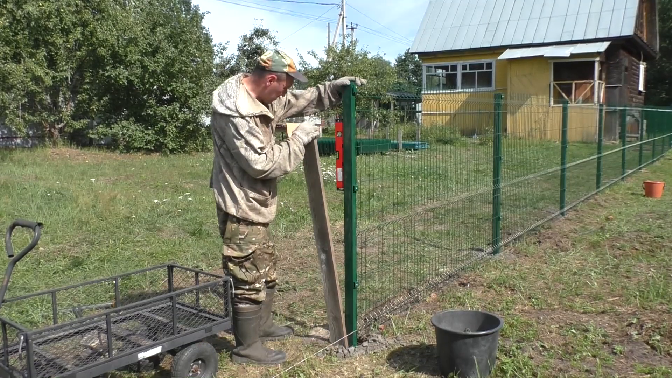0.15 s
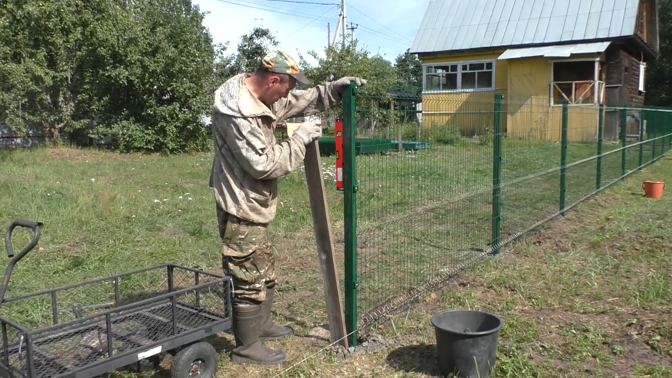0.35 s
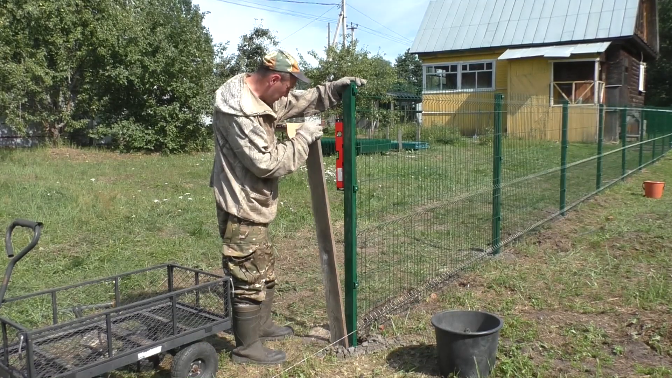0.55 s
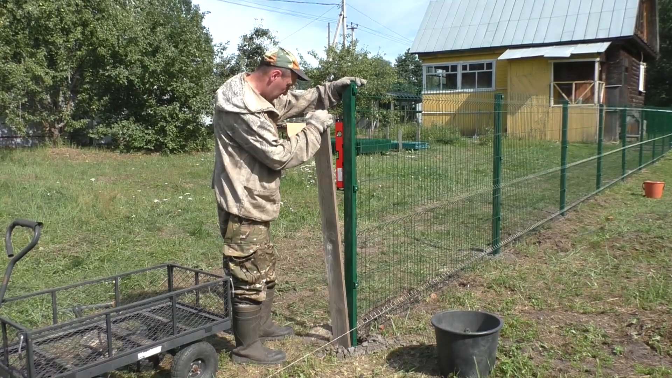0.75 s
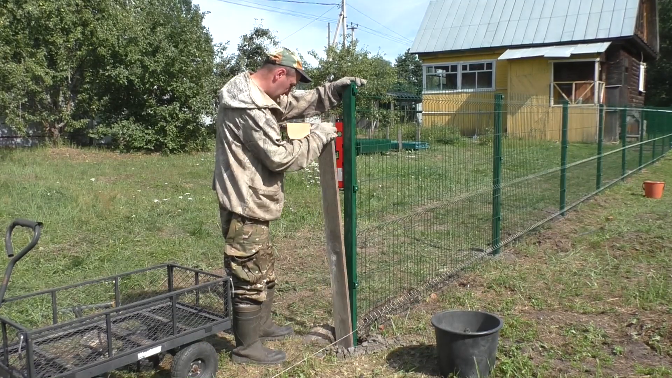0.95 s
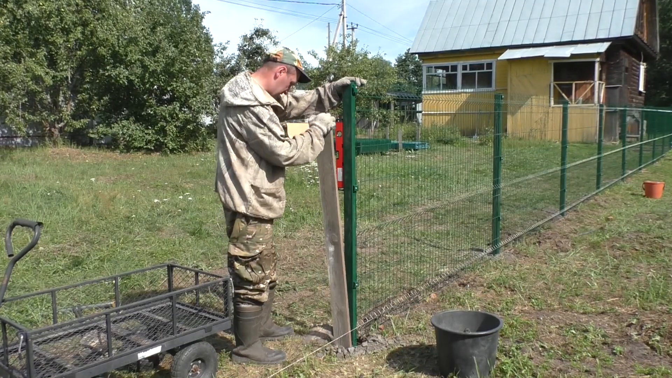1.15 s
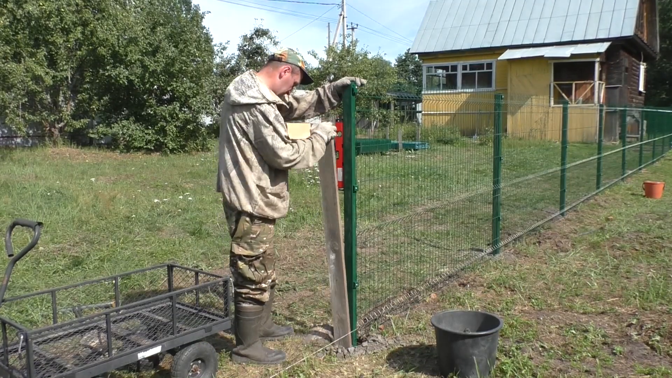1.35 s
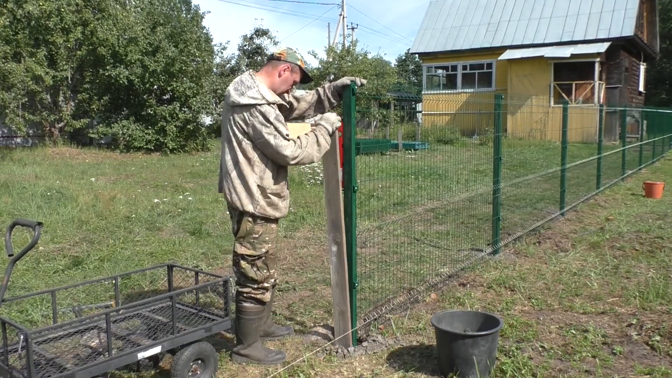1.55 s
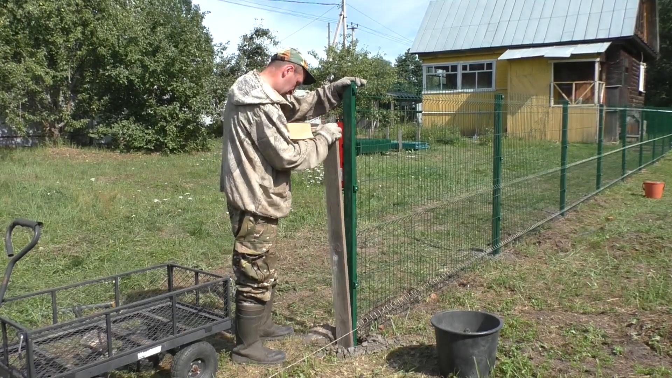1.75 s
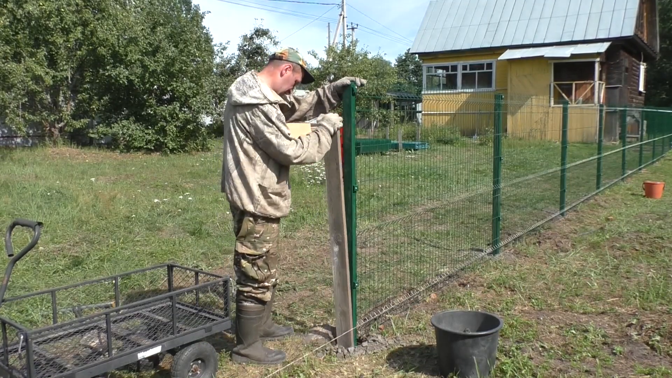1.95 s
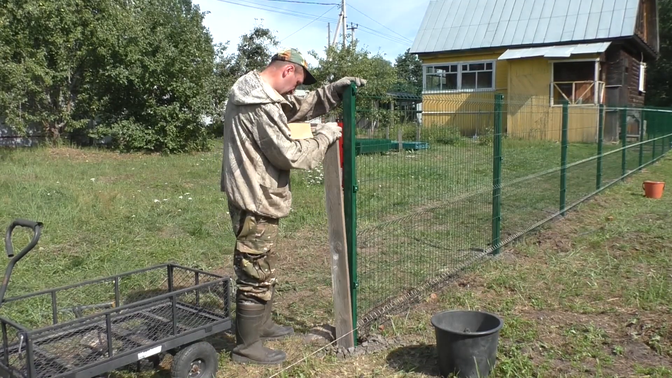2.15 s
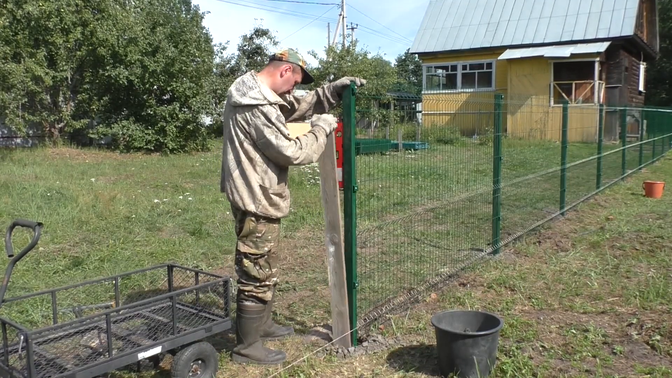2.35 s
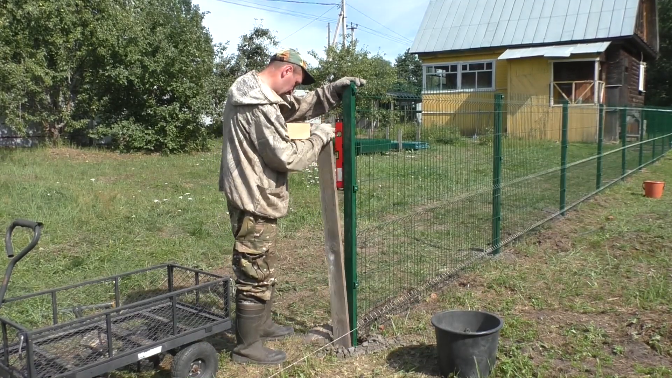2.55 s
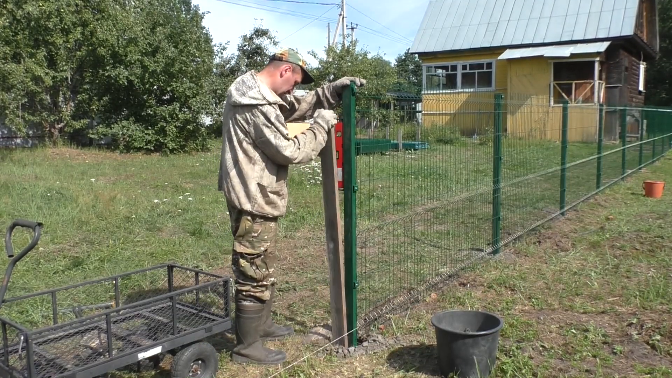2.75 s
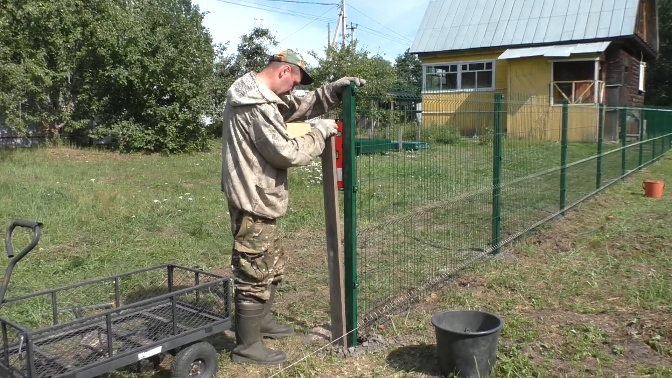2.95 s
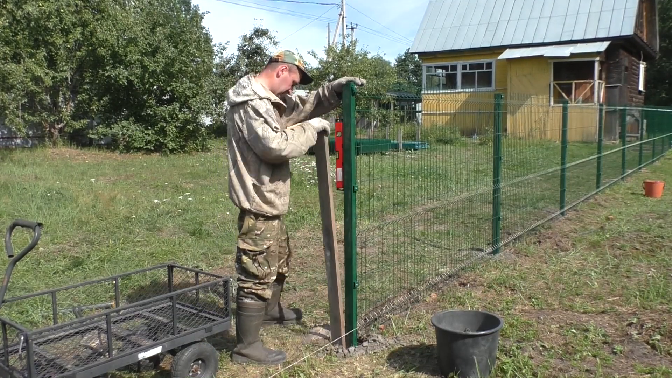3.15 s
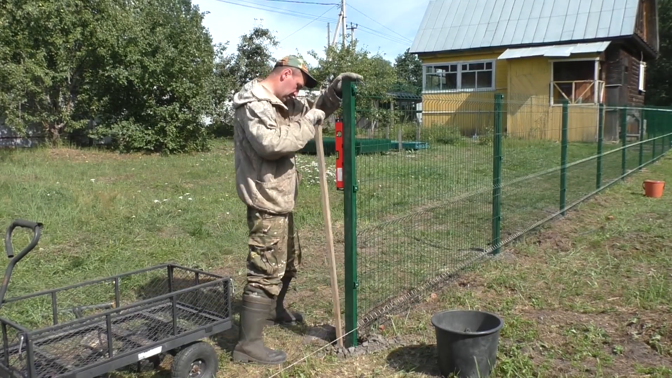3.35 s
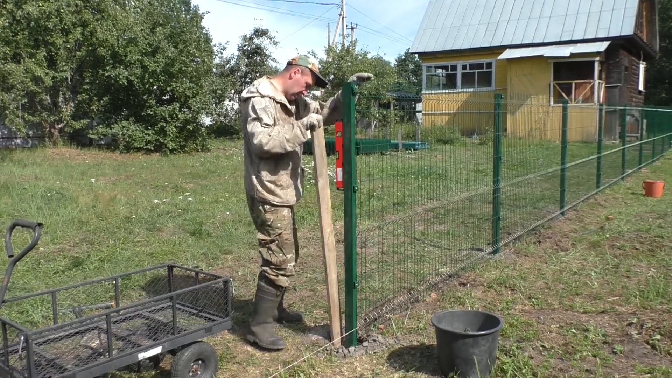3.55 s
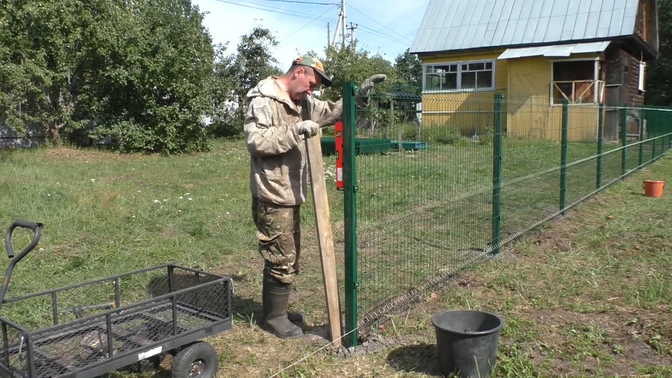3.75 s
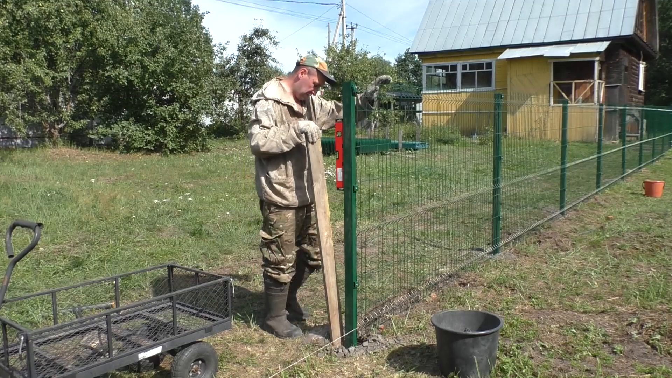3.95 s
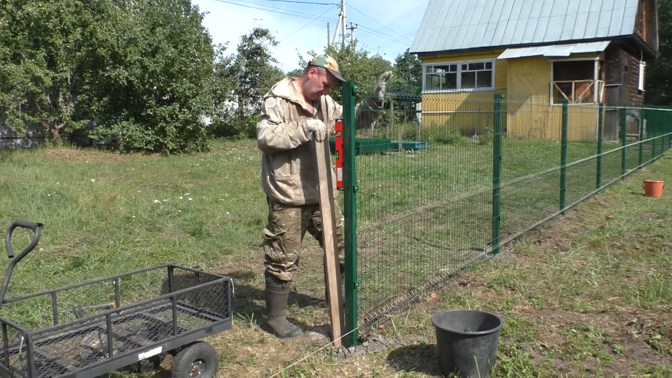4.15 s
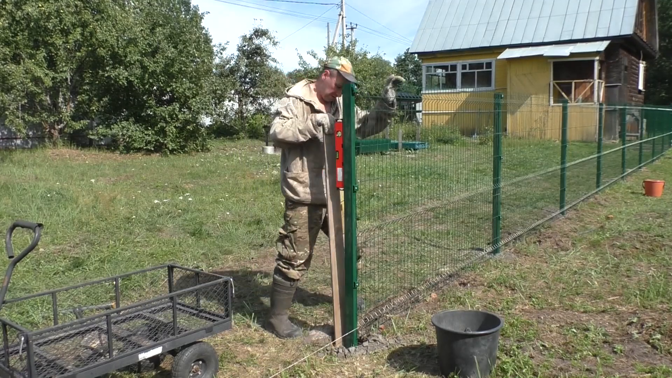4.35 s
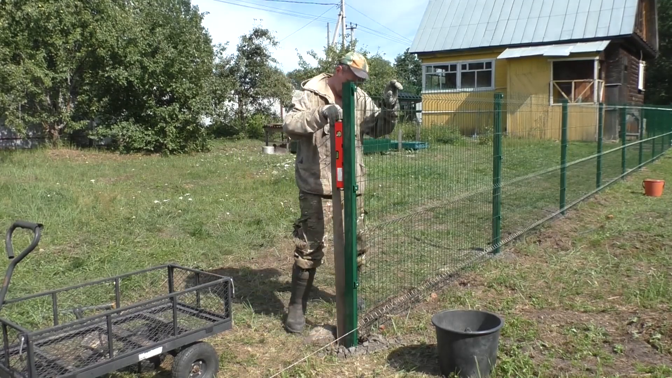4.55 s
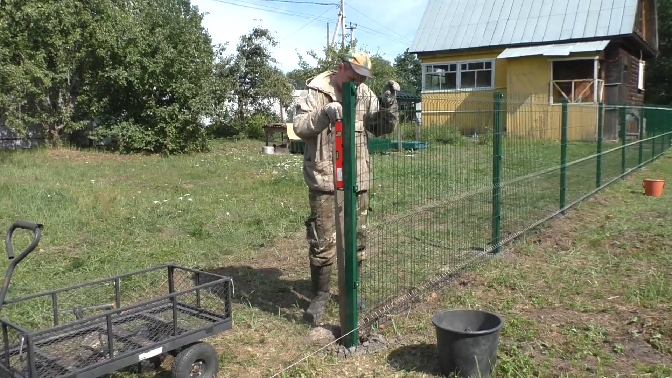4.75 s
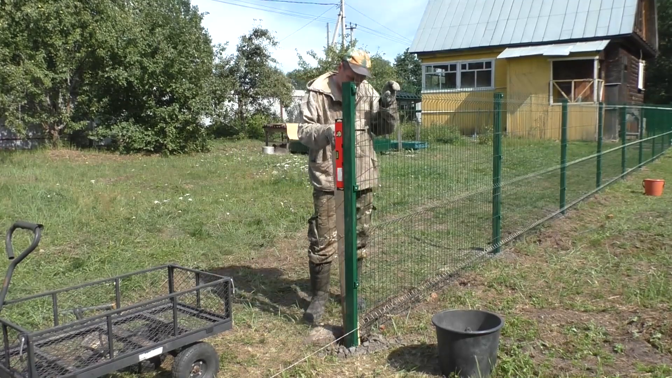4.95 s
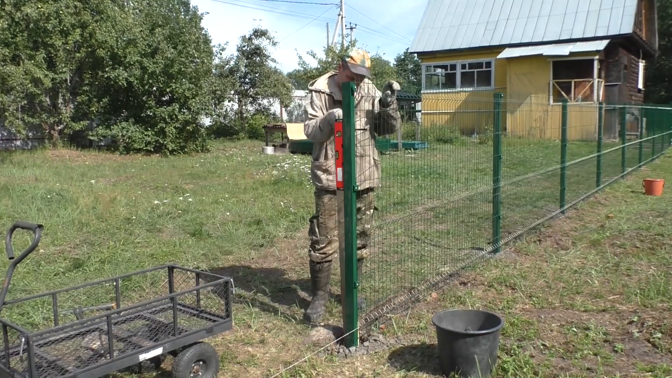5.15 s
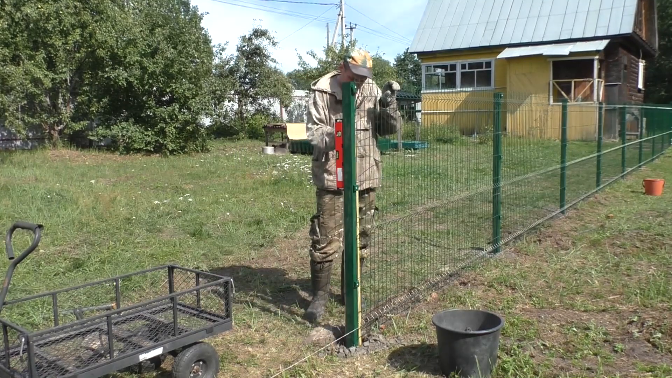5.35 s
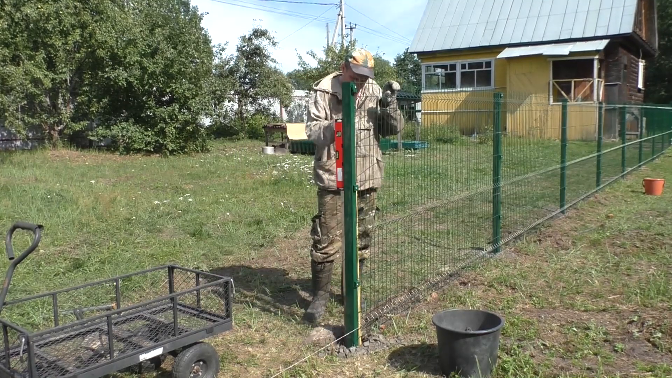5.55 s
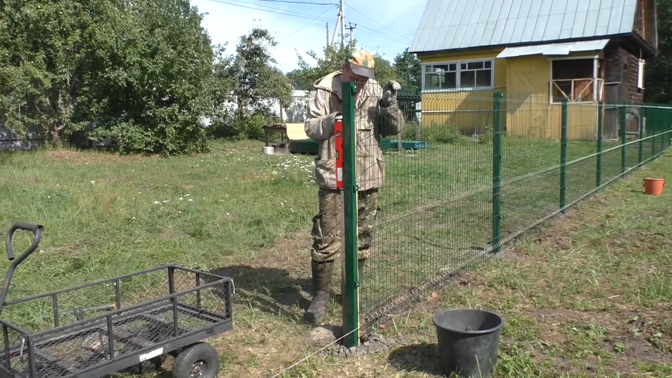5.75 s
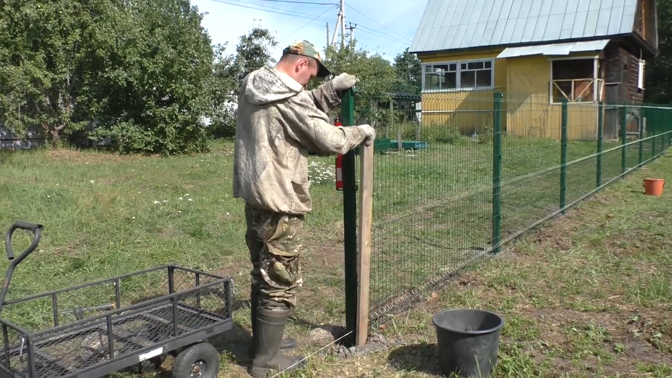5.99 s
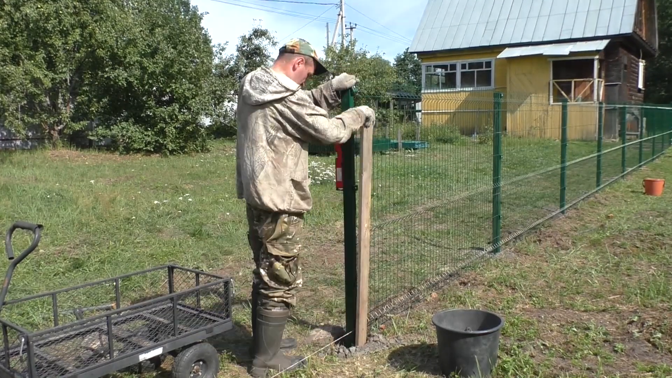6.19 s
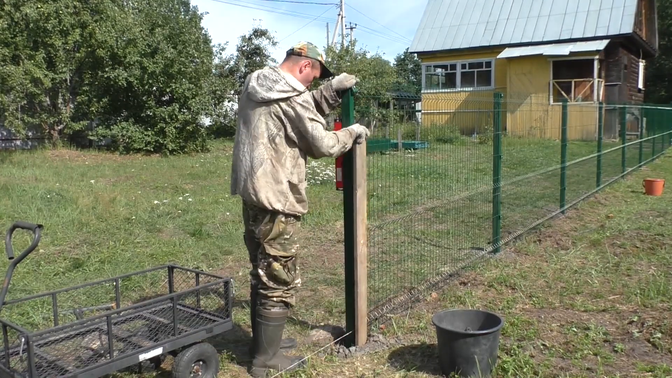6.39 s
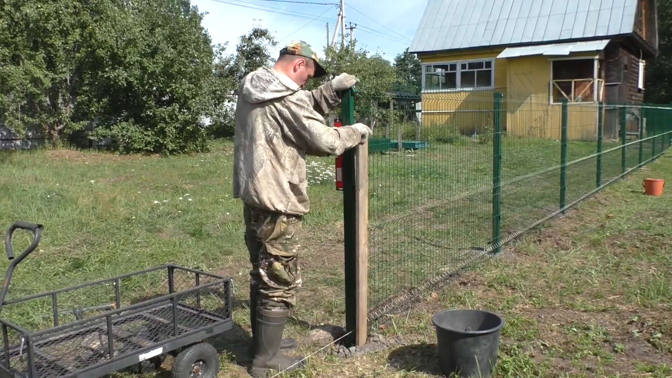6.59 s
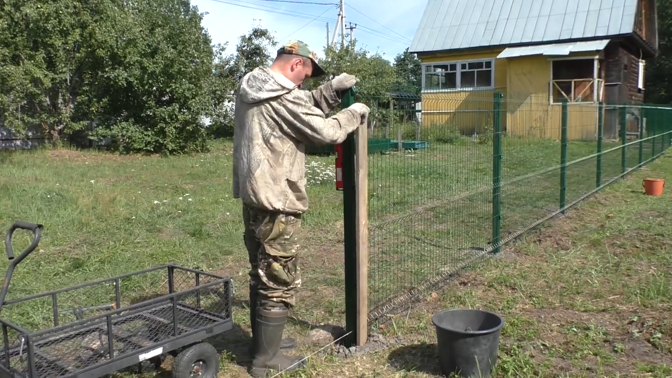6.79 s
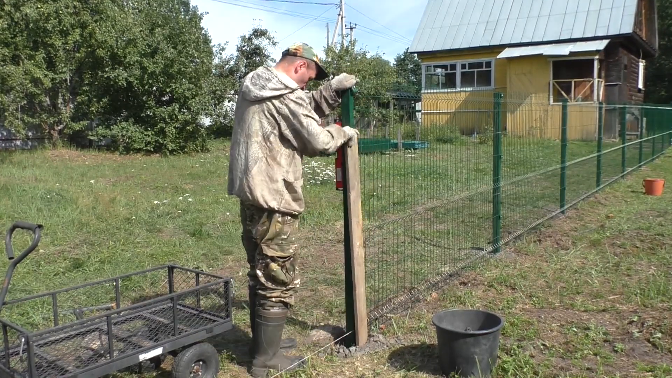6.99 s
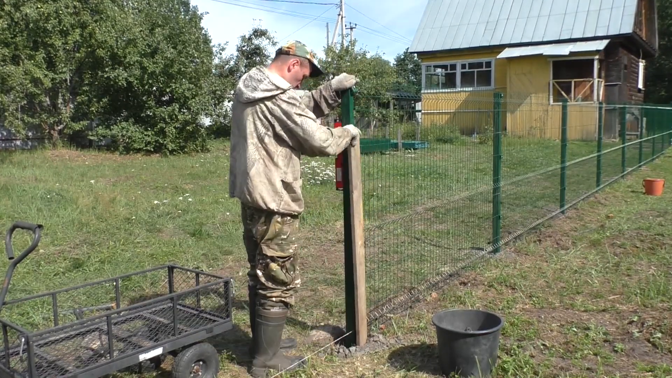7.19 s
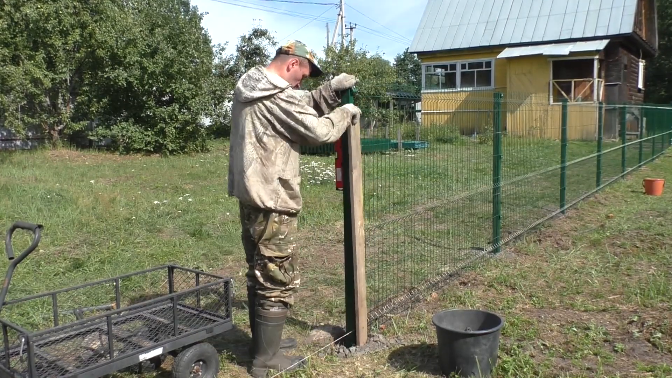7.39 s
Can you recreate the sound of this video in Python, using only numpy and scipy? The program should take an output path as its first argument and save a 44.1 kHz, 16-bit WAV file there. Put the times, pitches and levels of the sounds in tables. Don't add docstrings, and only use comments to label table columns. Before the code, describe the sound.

A calm garden opens with faint distant hum, leaf hiss and high grasshopper chorus; small pebbles tick and gravel shifts around 0.8 s. At 1.03 s a board rams gravel with a loud grinding crunch, ringing the steel post. Sharp stone-cracking blows follow at about 1.4, 1.8, 2.2, 2.6 and 2.9 s, with gravel trickling between and a near insect rasping from 1.8 to 2.6 s. Boots scuff near 3.3 s, a softer crunch lands at 3.7, then it is quieter with tiny ticks. Spaced blows resume at 4.9 and 5.4 s, then a rough double crunch with wire shiver at 5.9. Gravel scuffs and slides lead into very hard blows at 6.44 and 7.07 s, while low wind puffs bump the microphone from 6.1 to 7. Short echoes return from a wall and trees; gravel trickles out to the end at about 7.4 s.

```python
import sys
import numpy as np
from scipy import signal
from scipy.fft import rfft, irfft, next_fast_len
from scipy.io import wavfile
from scipy.ndimage import uniform_filter1d, map_coordinates

SR = 44100
rng = np.random.default_rng(int(sys.argv[2]) if len(sys.argv) > 2 else 0)


def wav_out(sig):
    wavfile.write(sys.argv[1], SR, np.round(np.clip(np.atleast_2d(sig).T, -1, 1) * 32767).astype(np.int16))


def invert_db(level):
    return 10 ** (np.asarray(level, dtype=float) / 20)


N = 327663

# time_s, gain_db
INPUT_GAIN = [(0, -0.5), (1.0, 0), (1.41, 1), (1.51, -5.5), (1.8, -7.5), (2.7, -5.5), (4.1, -6.5),
              (4.3, -4.5), (4.95, -4.5), (5.9, -3), (6.5, -3), (6.85, -1.5), (7.08, 4.5), (7.43, 0.5)]
# time_s, above_calm_db
BREEZE = [
    (0, 1),
    (1.4, 1),
    (3.4, 2),
    (5.9, 1),
    (6.13, 14),
    (6.46, 19),
    (6.85, 11),
    (7.1, 1.5),
    (7.43, 4),
]
# freq_hz, density_db_per_hz
HUM_SPECTRUM = [(65, -48), (110, -59), (127, -16), (234, -0.5), (375, -1.5), (594, -10), (677, -11.5),
                (1510, -9.5), (1810, -13.5), (2350, -17.5), (2860, -22.5), (4750, -32.5), (5500, -53),
                (7150, -56), (12100, -120)]
# freq_hz, density_db_per_hz
LEAF_SPECTRUM = [(2650, -36), (4500, -1), (5400, -1), (6200, 2.5), (7180, 7.5), (8270, 6.5), (8980, 8.5),
                 (10100, 6.5), (14700, 4.5), (15300, 9), (15900, -19), (16200, -50)]
# freq_hz, density_db_per_hz
WIND_SPECTRUM = [(8.8, -45), (15, -10.5), (70, 4), (171, -11.5), (205, 0.5), (260, -19), (340, -14),
                 (570, -120)]
# freq_hz, likeness_0_to_1
LIKENESS = [(60, 0.96), (130, 0.23), (290, 0.85), (640, 0.91), (1410, 0.78), (3100, 0.1), (6820, 0.91),
            (15000, 1.0)]
# start_s, peak_db, pitch_hz, left_minus_right_db
PUFFS = [
    (6.104, -42, 73.6, 9),
    (6.204, -41, 217, -12),
    (6.396, -36, 105.4, -13),
    (6.653, -35, 137, -5),
    (6.954, -39, 102, -4),
]
HUM_DB, LEAVES_DB, WIND_DB = -49, -55, -59
LEAVES_PER_GAIN, WIND_PER_GAIN, HUM_PER_BREEZE = 0.74, 1, 0.43

# time_s, level_db, wing_hz
CHORUS = [(0, -56, 7270), (.25, -67, 7220), (1, -88, 7300), (1.3, -59.5, 7300), (2.55, -63.5, 7330),
          (2.7, -64, 7740), (3.1, -61.5, 7900), (3.8, -69, 7600), (5.9, -65, 7500), (6.15, -60.5, 7300),
          (6.7, -58.5, 7300), (7.43, -57, 7300)]
# time_s, level_db
NEAR_INSECT = [
    (1.6, -90),
    (1.8, -66),
    (2.15, -56),
    (2.24, -54),
    (2.3, -52),
    (2.4, -54),
    (2.555, -51.5),
    (2.575, -90),
]
# centre_hz, width_hz, gain_db
WING_MODES = [(7330, 210, -6.5), (8050, 300, -6), (8900, 380, 0.5), (9900, 700, -2)]
STROKES_PER_S = 49.3

# delay_s, level_db, smear_s, top_hz
ECHOES = [
    (0.0274, -19.5, 0.0057, 7500),
    (0.092, -28, 0.033, 4870),
]
YARD_DB, YARD_T60_S = -23.5, 0.78

# freq_hz, density_db_per_hz
TRICKLE_SPECTRUM = [(410, -24), (700, -11), (818, -33), (934, -0.5), (1480, -3), (1670, 2.5), (1820, -4.5),
                    (2350, -10.5), (2630, -8.5), (2910, -8), (5000, -18.5), (6500, -74), (11000, -120)]
# freq_hz, density_db_per_hz
RUSTLE_SPECTRUM = [(1800, -11.5), (3000, 8.5), (4600, 2.5), (6500, 3), (9000, -2), (13000, -12),
                   (16500, -45)]
# peak_time_s, gravel_db, rustle_db, post_db
LIFTS = [(.8, -60, -62.5, -80), (1.09, -45, -53.5, -72), (1.24, -62, -72, -59), (1.47, -50.5, -56.5, -80),
         (1.97, -49.5, -56, -74), (2.33, -53.5, -58.5, -71), (2.9, -50, -68, -63), (3.29, -59.5, -82, -81),
         (3.8, -56.5, -78, -66), (4.45, -62, -75, -83), (5.049, -51.5, -61, -58.5),
         (5.451, -42.5, -53.5, -54), (6.1, -44.5, -51.5, -44), (6.53, -40.5, -51, -53.5),
         (6.82, -45.5, -58, -50.5), (7.12, -37, -48.5, -37.5), (7.25, -51, -58, -59)]
# gravel_db, rustle_db, post_db
REST_DB = (-62.5, -83.5, -84)
RUN_RISE_DB_PER_S = 135
GRAVEL_FALL_DB_PER_S, RUSTLE_FALL_DB_PER_S, POST_FALL_DB_PER_S = 33.5, 83, 20.5
RUSTLE_LAG_S, POST_LAG_S = 0.0037, 0.049

# start_s, peak_db,
# pitch_hz, t60_s
POST_PINGS = [(1.052, -29, 957, 0.38), (1.054, -38, 1708, 0.81), (1.06, -41, 1556, 0.74),
              (1.06, -31, 2500, 0.15), (5.974, -44, 1800, .08), (5.975, -42, 2650, .08),
              (7.113, -37, 2640, 0.87), (7.161, -26.5, 1650, 0.28), (1.83, -43.5, 954, 0.49),
              (2.2, -37.5, 966, 0.35), (2.724, -27.5, 1390, 0.027), (2.7236, -31, 1970, 0.025),
              (4.557, -44.5, 1490, 0.19), (4.941, -46, 1310, 0.93), (5.407, -30, 1380, 0.36),
              (5.929, -34.5, 932, 0.2), (5.869, -24, 323, 0.057)]
# start_s, peak_db
WIRE_PINGS = [
    (1.439, -46),
    (1.848, -55),
    (2.205, -53),
    (2.613, -47),
    (2.93, -44),
    (5.9225, -34),
]
WIRE_HZ, WIRE_T60_S = 13577, .25
SCENE_CHANGE_S = 5.972
# centre_hz, width_hz, gain_db
POST_MODES = [(925, 30, 8.5), (1190, 5.6, 16), (1390, 10, 15.5), (1620, 21, 10.5), (1714, 20, 12),
              (2625, 55, 15), (2650, 92, -2)]

# start_s, peak_db, pitch_hz
THUDS = [(1.4265, -28.5, 45), (1.815, -28, 45), (1.031, -20, 378), (1.424, -28, 152), (1.818, -22.5, 200),
         (2.187, -38, 140), (2.567, -26.5, 262), (2.913, -29.5, 280), (4.924, -27.5, 282),
         (5.393, -26.5, 110), (6.442, -26, 200), (7.066, -25.5, 251)]
SOIL_WIDTH_HZ = 223

# start_s, peak_db, stone_hz, bright_db, grind_s
SCUFFS = [(.89, -38, 3300, -26, 0.025), (.956, -42, 4070, -14, .0018), (2.611, -33, 1920, -17, 0.043),
          (2.62, -30, 5000, 24, 0.0022), (2.643, -33, 4910, 22, 0.0024), (2.674, -27.5, 3800, 4, 0.0077),
          (2.781, -37, 5500, 24, 0.0016), (3.263, -37.5, 1510, -4.5, 0.05), (3.574, -49, 4100, -14, .005),
          (3.627, -38, 2370, -2, 0.01), (3.8, -39, 1610, -16, .001), (4.734, -43.5, 2520, -4, 0.068),
          (4.882, -41, 2960, -14, 0.021), (5.40, -28.5, 1660, -10, 0.058), (6.076, -28, 3530, -5, 0.0015),
          (6.152, -31, 4600, 9, 0.002), (6.39, -32.5, 2200, -12, 0.041), (6.52, -30, 3620, -28, 0.1),
          (7.004, -23, 3200, -5, 0.057), (7.26, -30, 9150, -3, 0.011), (7.308, -43, 2600, -17, 0.0064)]
# start_s, peak_db, stone_hz, bright_db, grind_s
SETTLES = [(.757, -42, 3720, -12, .005), (.866, -37.5, 2720, -5, 0.0083), (1.589, -35, 1510, -27, 0.0027),
           (1.952, -35, 1230, -26, 0.0053), (2.722, -38, 1620, -35, 0.024), (3.289, -32, 1760, 5.5, 0.01),
           (3.679, -19, 2600, -10.5, 0.011), (3.755, -34, 2560, -10, 0.011), (4.556, -46, 1470, -30, 0.022),
           (4.935, -20, 2150, -11, 0.019), (5.196, -41, 1620, -26, 0.012),
           (5.388, -9.5, 2100, -9.5, 0.0075), (5.488, -30, 1660, -4, 0.015),
           (5.865, -9.5, 1950, -13.5, 0.0089), (5.9232, -17, 3030, -2.5, 0.0068),
           (6.009, -26, 1480, -11, 0.048), (7.009, -17.5, 2000, -5, 0.037), (7.164, -26.5, 1650, -9, 0.04)]
# start_s, peak_db, stone_hz, bright_db, slide_s
SLIDES = [
    (2.545, -31, 2840, -5, 0.033),
    (5.36, -37, 1570, -24, 0.027),
    (6.41, -20, 1300, -11, 0.038),
    (7.03, -11, 1510, -11, 0.043),
]
# start_s, peak_db, stone_hz, bright_db, grind_s
RAMS = [(1.031, -10.5, 1280, -29, 0.016), (1.029, -5.5, 2540, -6.5, 0.027),
        (1.4248, -11, 2440, -4.5, 0.0065), (1.809, -7, 1390, -24, 0.017), (1.808, -7, 2120, -2, 0.015),
        (2.565, -6, 2140, 0.5, 0.0012), (2.184, -1, 1404, -8.5, 0.0039), (2.5828, -9, 2600, 6, 0.0037),
        (2.901, -23, 2600, -4, 0.01), (2.911, -7.5, 2840, -6, 0.0023), (2.913, -22, 1256, -40, 0.0074),
        (3.671, -18, 1560, -20, 0.016), (4.9212, -9, 1920, -7, 0.012), (5.3845, -8.5, 2120, -24, 0.0041),
        (5.876, -13, 1540, -24, 0.018), (5.925, -21.5, 1180, -8, 0.044), (6.415, -17, 2270, -27, 0.0046),
        (6.4415, 0, 2100, -7, 0.0049), (6.443, -23, 1080, -25, 0.0014), (7.063, -5, 2940, -3, 0.0066),
        (7.076, -15, 1500, -8, 0.0057)]
# centre_hz, width_hz, gain_db
BOARD_MODES = [(1020, 600, 8.5), (1300, 630, 13), (1650, 595, 7.5), (2100, 41, 4.5), (2600, 180, -5),
               (3200, 2340, 1), (4570, 1590, -1)]

# peak_time_s, peak_db, pitch_hz
TICKS = [(.8685, -33, 2400), (.869, -39, 4600), (3.2925, -43, 1750), (4.9125, -34, 1650),
         (5.9226, -24, 1900), (.9075, -36, 3560), (.9185, -39, 3280), (.9185, -42, 4700), (1.29, -49, 3700),
         (1.362, -45, 3560), (3.849, -36, 1420), (3.927, -55, 3800), (3.968, -52, 5000), (4.058, -52, 3800),
         (4.558, -42, 2000), (4.562, -48, 3250), (6.0095, -33, 1400), (7.165, -37, 1650)]
# peak_time_s, peak_db, pitch_hz
STRUCK_STONES = [(1.0323, -13.5, 3300), (1.0325, -12, 2010), (1.0328, -16, 1270), (1.0335, -13.5, 2710),
                 (1.0375, -14, 1780), (1.039, -12, 2600), (1.0455, -21, 3230), (1.0427, -20, 1300),
                 (1.044, -18, 2570), (1.044, -17, 1970), (1.0485, -17, 2530), (1.0486, -21, 1540),
                 (1.057, -21, 1300), (1.0745, -24, 1520), (1.426, -17.5, 1215), (1.4275, -16, 1650),
                 (1.4297, -25, 3050), (1.4327, -26, 2380), (1.433, -30, 1400), (1.8096, -18.5, 1300),
                 (1.8101, -17.5, 2080), (1.8109, -21, 6250), (1.8183, -24, 1950), (1.8192, -20, 2550),
                 (1.8194, -18, 1470), (2.1847, -25, 1260), (2.1857, -16.5, 1646), (2.1868, -22, 1200),
                 (2.1885, -15, 2600), (2.1895, -18, 1300), (2.1903, -41, 2060), (2.1919, -20, 3000),
                 (2.566, -20, 3800), (2.5662, -23, 2270), (2.5667, -20.5, 1140), (2.567, -24, 4550),
                 (2.5834, -17, 3960), (2.5838, -21, 4820), (2.584, -13, 3060), (2.5857, -18.5, 1970),
                 (2.912, -26, 1840), (2.9142, -18, 2985), (2.9147, -17, 6100), (2.9151, -19.5, 1410),
                 (2.9151, -20, 4920), (2.9153, -28, 4070), (2.9159, -18, 2070), (3.6815, -27, 1650),
                 (3.6827, -29, 2400), (3.6856, -32, 3200), (3.6886, -22, 2630), (3.6936, -31, 2600),
                 (3.7002, -32, 2530), (3.712, -39, 1090), (3.718, -37, 2720),
                 (4.9226, -16, 1720), (4.922, -24, 5230), (4.9255, -27, 2540), (4.9266, -17.5, 1200),
               (4.9273, -24, 3640), (4.9277, -18, 2020), (4.9288, -19.5, 2650), (4.932, -14, 1534),
               (4.9327, -25, 2200), (4.9424, -20, 1510), (5.3892, -18, 2600), (5.3888, -14, 2020),
               (5.3925, -25, 3420), (5.3928, -31, 4530), (5.3927, -8, 2834), (5.3935, -24, 2120),
               (5.3939, -22, 4830), (5.3983, -25, 1490), (5.8658, -28, 2600), (5.866, -19, 3880),
               (5.8667, -12, 2190), (5.8682, -14.5, 3300), (5.8682, -18, 1640), (5.8716, -20, 2300),
               (5.8767, -25, 1610), (5.8805, -12, 1560), (5.885, -30, 1650), (5.923, -28, 3990),
               (5.923, -24, 6430), (5.9232, -33, 3030), (5.9234, -25, 2400), (5.928, -29, 1300),
               (5.9285, -22, 3440), (5.933, -36, 1050), (5.94, -35, 1290), (5.9456, -27, 1400),
               (6.4427, -13.5, 3800), (6.4423, -6, 1824), (6.4428, -11, 2620), (6.442, -25, 1430),
               (6.4428, -22, 3340), (6.4442, -10, 4600), (6.4436, -14.5, 6000), (6.4458, -15, 1740),
               (6.447, -20, 2650), (7.0525, -18, 1440), (7.0555, -25, 1800), (7.0584, -24, 1850),
               (7.0667, -33, 1540), (7.0656, -24, 1110), (7.0656, -10, 2270), (7.0656, -11, 4600),
               (7.0666, -13, 3340), (7.0673, -18, 3700), (7.0692, -15.5, 1600), (7.07, -25, 2000),
               (7.0793, -24, 1480)]
# peak_time_s, peak_db, centre_hz
CRACKS = [(1.4242, -7, 4400), (1.4245, -7.5, 9870), (1.8189, -3, 4030), (2.1866, -2, 4390),
          (2.1869, -13, 2560), (2.1866, -13, 8900), (2.1866, -16, 13300), (2.5655, -11.5, 2840),
          (2.5834, -8, 2870), (2.9147, -11, 3420), (5.3883, -15, 2300), (5.3883, -19, 4600),
          (5.3883, -23, 10500), (5.3932, -17, 5000), (6.4414, -11, 10500), (7.0658, -18, 8650)]
# peak_time_s, peak_db, centre_hz
BREAKS = [
    (1.4247, -1, 2820),
    (7.0659, -2, 3130),
]
# start_s, peak_db, pitch_hz, bright_db
SNAPS = [(1.03, -7.5, 2600, 0.5), (1.4232, -15, 2620, 4), (1.8102, -7.5, 1660, -26), (1.8189, -6, 3080, -5),
         (2.188, -9, 2940, 5), (2.5656, -7, 2480, -24), (2.5835, -8, 3020, -11), (2.9147, -20, 2100, -42),
         (3.849, -34, 1890, -22), (4.9238, -11.5, 2520, 23), (5.3923, -1, 2770, -36),
         (5.8654, -9, 1980, -33), (5.9223, -21, 3200, -8), (6.427, -19, 2600, -9), (6.4412, 0.5, 2600, -34),
         (7.0659, -6.5, 2550, 27)]
STONE_RISE_S, TICK_RISE_S, CRACK_RISE_S, BREAK_RISE_S = 0.00111, 0.0006, 0.00013, 0.00024
SMALL_STONE_HZ, SIZE_LAW = 2200, .7
RAM_DB, SNAP_DB = -5.5, -1

DULL_MOMENTS = [
    1.44,
    1.835,
    2.205,
    2.93,
    5.94,
    6.46,
]
DULL_LENGTH_S, DULL_ABOVE_HZ = .06, 14600


def rms_one(x):
    return x / np.sqrt(np.mean(x ** 2) + 1e-20)


def in_time(rows):
    time_s, *columns = np.transpose(rows)
    return [np.interp(np.arange(N) / SR, time_s, column) for column in columns]


def drift(rate_hz):
    coarse = np.arange(0, N + 64, 64)
    wander = map_coordinates(rng.standard_normal(4000), [coarse / SR * rate_hz * 2], order=3)
    return np.interp(np.arange(N), coarse, wander)


def resonance(x, hz, width_hz):
    r = np.exp(-np.pi * width_hz / SR)
    poles = [1, -2 * r * np.cos(2 * np.pi * hz / SR), r * r]
    return signal.lfilter([(1 - r * r) / 2, 0, (r * r - 1) / 2], poles, x)


def body(x, modes, width_scale=1):
    out = 0
    for k, (hz, width_hz, gain_db) in enumerate(modes):
        out = out + (-1) ** k * invert_db(gain_db) * resonance(x, hz, width_scale * width_hz)
    return out


def band(x, low_hz, high_hz):
    return signal.sosfilt(signal.butter(2, [low_hz, high_hz], "band", fs=SR, output="sos"), x)


def grit(shape, spread_db):
    contact_db = spread_db * np.minimum(rng.exponential(1, shape), 6)
    return rng.standard_normal(shape) * invert_db(contact_db)


def coloured(source, spectrum, alike_scale):
    size = next_fast_len(N, real=True)
    log_hz = np.log(np.fft.rfftfreq(size, 1 / SR) + 1)

    def read(table):
        hz, value = np.transpose(table)
        return np.interp(log_hz, np.log(hz), value)

    alike = np.clip(1 - alike_scale * (1 - read(LIKENESS)), 0, 1)
    mid, side = rfft(source, size) * invert_db(read(spectrum))
    stereo = np.sqrt(1 + alike) * mid + np.sqrt(1 - alike) * side * [[1], [-1]]
    return rms_one(irfft(stereo, size)[:, :N])


def add(out, start_s, sound, peak_db):
    i = round(start_s * SR)
    out[i:i + len(sound)] += (invert_db(peak_db) * sound / np.abs(sound).max())[:N - i]


def distant_hum(gain_db, breeze_db):
    level_db = HUM_DB + gain_db + HUM_PER_BREEZE * breeze_db + drift(9.1)
    return invert_db(level_db) * coloured(rng.standard_normal((2, N)), HUM_SPECTRUM, alike_scale=0.71)


def leaves(gain_db):
    level_db = LEAVES_DB + LEAVES_PER_GAIN * gain_db + 0.3 * drift(3.5)
    return invert_db(level_db) * coloured(rng.standard_normal((2, N)), LEAF_SPECTRUM, alike_scale=1.0)


def puffs():
    out, t = np.zeros((2, N)), np.arange(4096) / SR
    for start_s, peak_db, hz, pan_db in PUFFS:
        lump = np.sin(2 * np.pi * hz * t) * t * invert_db(-60 * t / 0.07)
        add(out[0], start_s, lump, peak_db + pan_db / 2)
        add(out[1], start_s, lump, peak_db - pan_db / 2)
    return out


def port_wind(gain_db, breeze_db):
    lumps_db = 3 * np.array([drift(11), drift(18)])
    gusts = invert_db(WIND_DB + WIND_PER_GAIN * gain_db + breeze_db + lumps_db)
    return gusts * coloured(rng.standard_normal((2, N)), WIND_SPECTRUM, alike_scale=0.93) + puffs()


def grasshoppers():
    level_db, wing_hz = in_time(CHORUS)
    low_pass = signal.butter(2, 260, fs=SR, output="sos")
    blur = signal.sosfilt(low_pass, rng.standard_normal((2, N)))
    carrier = np.exp(2j * np.pi * np.cumsum(wing_hz) / SR)
    chorus = rms_one(np.real((blur[0] + 1j * blur[1]) * carrier))
    cycles = STROKES_PER_S * np.arange(N) / SR + 0.52
    stroke = (0.57 + 0.42 * np.cos(2 * np.pi * cycles)) ** 0.87
    uneven_db = 1.6 * rms_one(uniform_filter1d(blur[0], size=900))
    rasp = band(rng.standard_normal(N) * stroke, 5500, 7400)
    solo = invert_db(uneven_db) * rms_one(body(rasp, WING_MODES))
    return invert_db(level_db) * chorus + invert_db(in_time(NEAR_INSECT)[0]) * solo


def yard(x):
    t = np.arange(40000) / SR
    noise = rng.standard_normal((3, 40000))
    noise = noise[2] + .5 * noise[:2]
    scatter = band(noise, 330, 3260) * np.minimum(t / 0.021, 1) * invert_db(-60 * t / YARD_T60_S) / 30
    path = invert_db(YARD_DB) * scatter
    for delay_s, level_db, smear_s, top_hz in ECHOES:
        late = (t - delay_s) / smear_s
        tail = (late > 0) * np.exp(-np.abs(late)) / np.sqrt(smear_s * SR / 2)
        path += invert_db(level_db) * band(noise, 270, top_hz) * tail
    return signal.oaconvolve(x[None], path, axes=1)[:, :N]


def run_back(peaks_db, rest_db, fall_db_per_s, lag_s):
    since_s = np.arange(0, N / SR + .01, .01) - np.array(LIFTS)[:, :1] - lag_s
    loss_db = np.where(since_s < 0, -RUN_RISE_DB_PER_S * since_s, fall_db_per_s * since_s)
    swell_db = peaks_db[:, None] - loss_db
    total_db = 10 * np.log10(invert_db(2 * swell_db).sum(axis=0) + invert_db(2 * rest_db))
    return np.interp(np.arange(N) / SR, np.arange(len(total_db)) / 100, total_db)


def trickle(lift_db):
    level_db = run_back(lift_db, REST_DB[0], GRAVEL_FALL_DB_PER_S, 0) + 1.6 * drift(45)
    return invert_db(level_db) * coloured(grit((2, N), spread_db=2.2), TRICKLE_SPECTRUM, alike_scale=0.44)


def rustle(lift_db):
    level_db = run_back(lift_db, REST_DB[1], RUSTLE_FALL_DB_PER_S, RUSTLE_LAG_S)
    level_db = level_db + 5.5 + 1.8 * drift(30)
    return invert_db(level_db) * coloured(grit((2, N), spread_db=3.5), RUSTLE_SPECTRUM, alike_scale=0.61)


def fence():
    out, t = np.zeros(N), np.arange(20000) / SR
    wire = [(start_s, peak_db, WIRE_HZ, WIRE_T60_S) for start_s, peak_db in WIRE_PINGS]
    for start_s, peak_db, hz, t60_s in POST_PINGS + wire:
        pair = np.sin(2 * np.pi * hz * t) + 0.33 * np.sin(2 * np.pi * (hz + 23) * t)
        pair = pair * ((start_s > SCENE_CHANGE_S) | (start_s + t < SCENE_CHANGE_S))
        add(out, start_s, pair * np.minimum(t / 0.0003, 1) * invert_db(-60 * t / t60_s), peak_db)
    return out


def post(blows, lift_db):
    level_db = run_back(lift_db, REST_DB[2], POST_FALL_DB_PER_S, POST_LAG_S) + 2.2 * drift(80)
    rubbed = rms_one(body(grit(N, spread_db=6.0), POST_MODES, width_scale=1.2))
    struck = body(blows, POST_MODES, width_scale=.8)
    return invert_db(-26) * struck + invert_db(level_db) * rubbed


def thuds():
    out, t = np.zeros(N), np.arange(4096) / SR
    for start_s, peak_db, hz in THUDS:
        add(out, start_s, resonance(t * np.exp(-t / 0.0001), hz, SOIL_WIDTH_HZ), peak_db)
    return out


def stones(table, rise_s, size_law):
    out, t = np.zeros(N), np.arange(1024) / SR
    for peak_time_s, peak_db, hz in table:
        swell_s = rise_s * min(SMALL_STONE_HZ / hz, 1) ** size_law
        ring = np.sin(2 * np.pi * hz * t) * t * np.exp(-t / swell_s)
        add(out, peak_time_s - swell_s, ring, peak_db)
    return out


def snaps():
    out, t = np.zeros(N), np.arange(2048) / SR
    kicks = rng.standard_normal((len(SNAPS), 2048))
    for (start_s, peak_db, hz, bright_db), kick in zip(SNAPS, kicks):
        click = (t == 0) + .08 * kick * invert_db(-60 * t / .003)
        stone = resonance(resonance(click, hz, 1400), hz * 1.1, 3600)
        spit = band(kick * invert_db(-60 * t / 0.0081), 5300, 12000)
        snap = stone / np.abs(stone).max() + invert_db(bright_db) * spit / np.abs(spit).max()
        add(out, start_s, snap, peak_db)
    return out


def crunches(table, trend_db, stop_s, stop_per_length):
    out, t = np.zeros(N), np.arange(8192) / SR
    all_slips = grit((len(table), 8192), spread_db=3.5)
    for (start_s, peak_db, hz, bright_db, grind_s), slips in zip(table, all_slips):
        t60_s = stop_s + stop_per_length * grind_s
        after = np.maximum(t - grind_s, 0) / max(t60_s, .004)
        trend = invert_db(trend_db * np.minimum(t / max(grind_s, .001), 1))
        load = np.minimum(t / 0.00079, 1) * trend
        low = slips * load * invert_db(-60 * after)
        high = slips * load * invert_db(-90 * after)
        ring = invert_db(-9.0) * body(low, BOARD_MODES) + resonance(low, hz, 0.17 * hz)
        hiss = invert_db(bright_db - 9.0) * band(high, 4200, 10050)
        add(out, start_s, band(ring, 746, 12200) + hiss, peak_db)
    return out


def board_blows():
    out = invert_db(RAM_DB) * crunches(RAMS, trend_db=-2.0, stop_s=0.018, stop_per_length=1.16)
    out += crunches(SETTLES, trend_db=-2.0, stop_s=0.011, stop_per_length=8.6)
    out += crunches(SCUFFS, trend_db=-6.0, stop_s=0.019, stop_per_length=1.4)
    out += crunches(SLIDES, trend_db=10.0, stop_s=0.035, stop_per_length=0)
    out += invert_db(SNAP_DB) * snaps() + thuds()
    out += stones(STRUCK_STONES, STONE_RISE_S, SIZE_LAW)
    out += stones(TICKS, TICK_RISE_S, SIZE_LAW)
    out += stones(CRACKS, CRACK_RISE_S, 0)
    out += stones(BREAKS, BREAK_RISE_S, 0)
    return out


def scene():
    (gain_db,), (breeze_db,) = in_time(INPUT_GAIN), in_time(BREEZE)
    air = distant_hum(gain_db, breeze_db) + leaves(gain_db) + port_wind(gain_db, breeze_db)
    _, gravel_db, soil_db, tube_db = np.transpose(LIFTS)
    gravel = trickle(gravel_db) + rustle(soil_db)
    blows = board_blows()
    near = blows + post(blows, tube_db) + fence() + grasshoppers()
    skew = invert_db(-23.0) * np.roll(blows, round(0.00018 * SR))
    return near + skew * [[1], [-1]] + yard(blows) + gravel + air


def top_cut(x):
    return signal.sosfilt(signal.butter(12, 16700, fs=SR, output="sos"), x)


def record(dry):
    release_db = 60 * np.arange(N) / SR
    over_db = np.maximum(20 * np.log10(np.abs(dry).max(axis=0) + 1e-9) + 9, 0)
    held_db = np.maximum.accumulate(over_db + release_db) - release_db
    duck_db = np.roll(held_db, round(0.017 * SR))
    ridden = dry * invert_db(-.6 * uniform_filter1d(duck_db, size=200))
    low_pass = signal.butter(10, 16000, fs=SR, output="sos")
    smooth = signal.sosfilt(low_pass, np.clip(ridden, -.86, .86))
    since_s = np.arange(N) / SR - np.array(DULL_MOMENTS)[:, None]
    dull = ((since_s > 0) & (since_s < DULL_LENGTH_S)).any(axis=0)
    dull = uniform_filter1d(1. * dull, size=400)
    high_pass = signal.butter(10, DULL_ABOVE_HZ, "high", fs=SR, output="sos")
    mix = smooth - dull * signal.sosfiltfilt(high_pass, smooth)
    return top_cut(mix)


dry = scene()
out = record(dry)
wav_out(out)
```